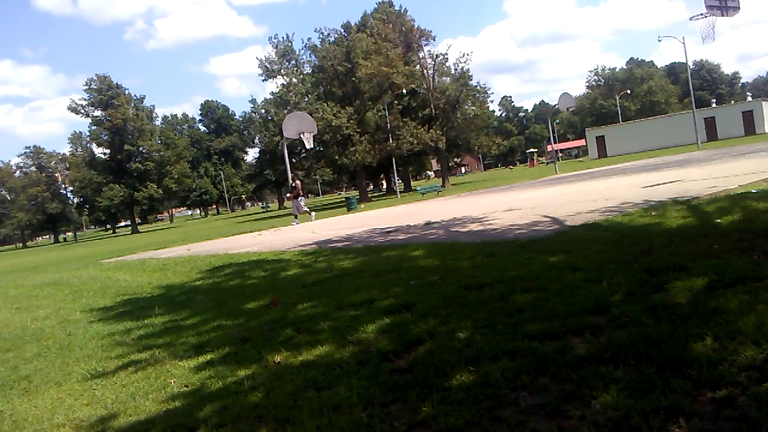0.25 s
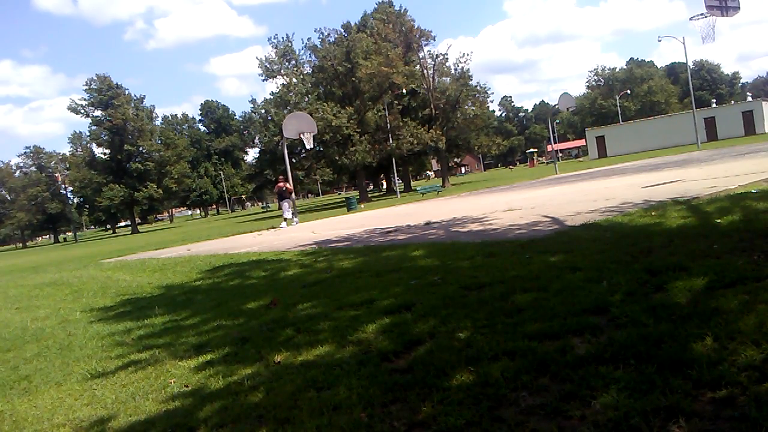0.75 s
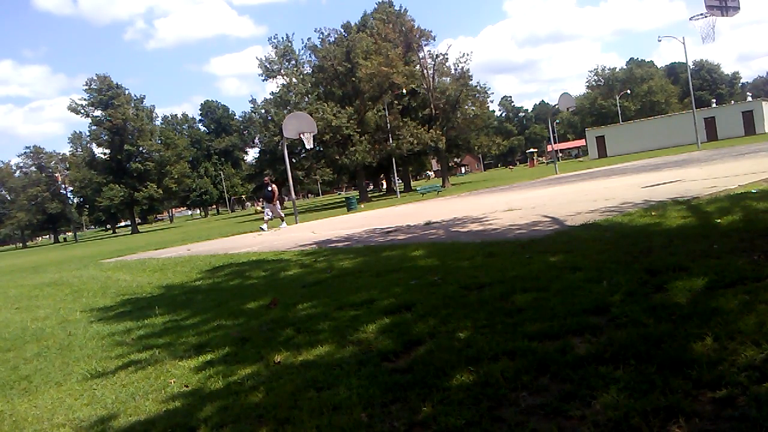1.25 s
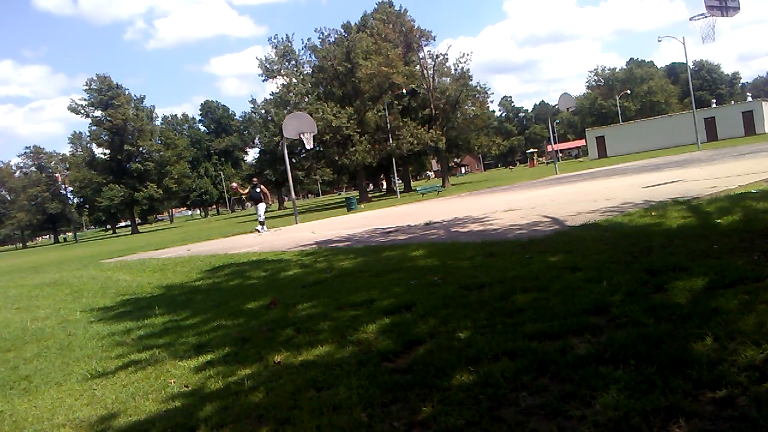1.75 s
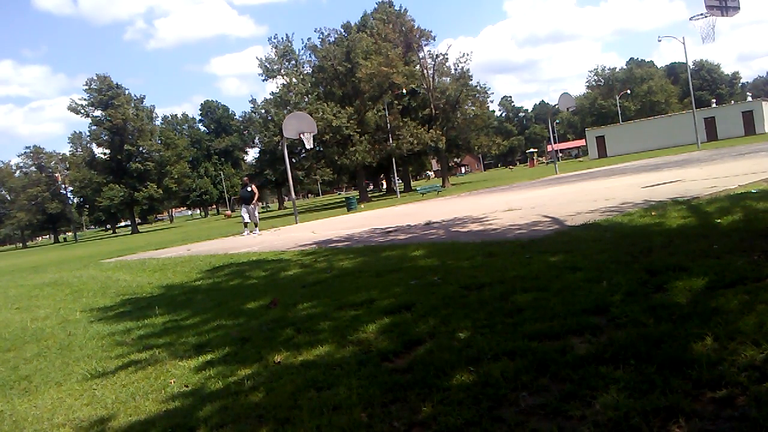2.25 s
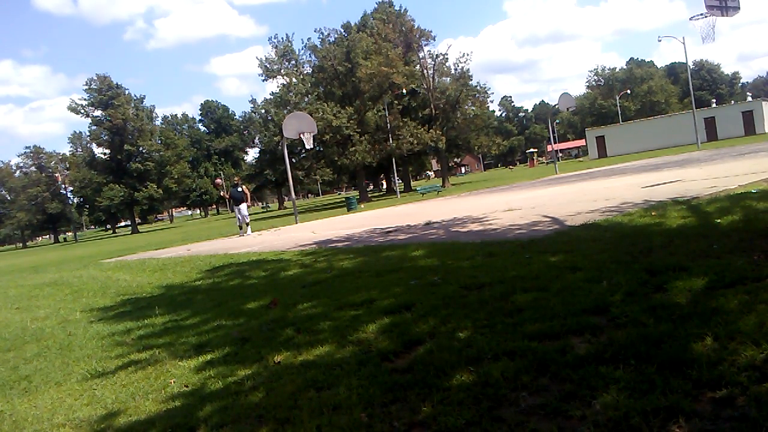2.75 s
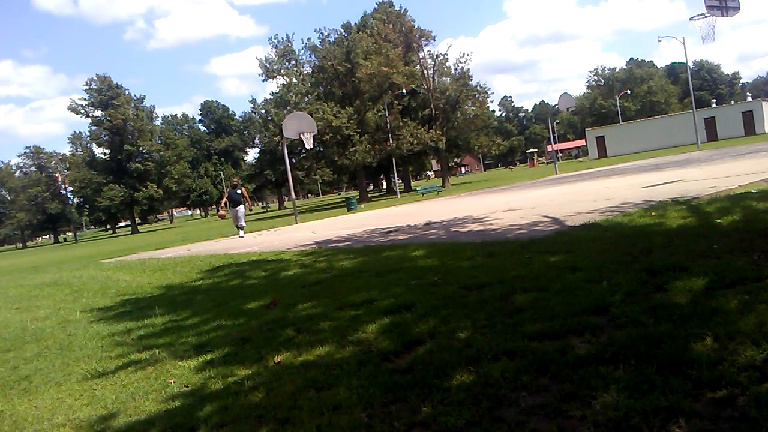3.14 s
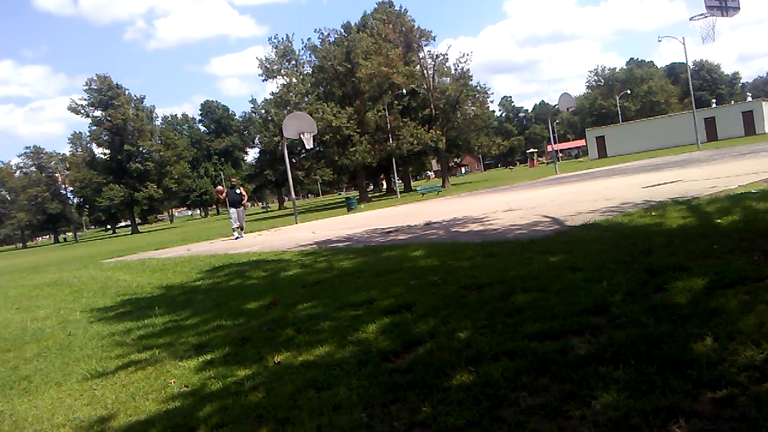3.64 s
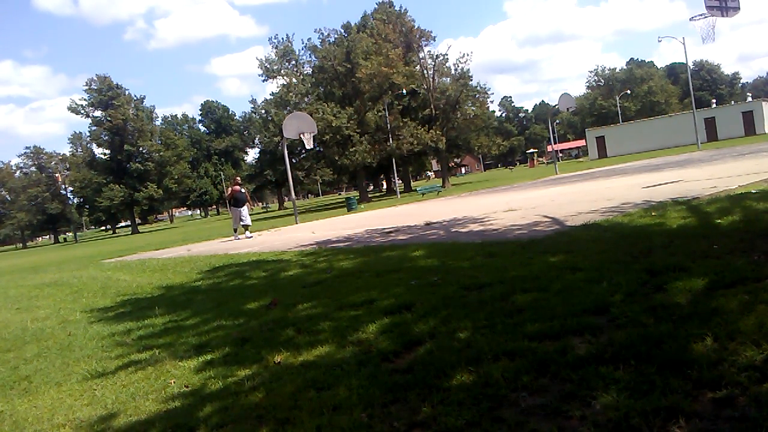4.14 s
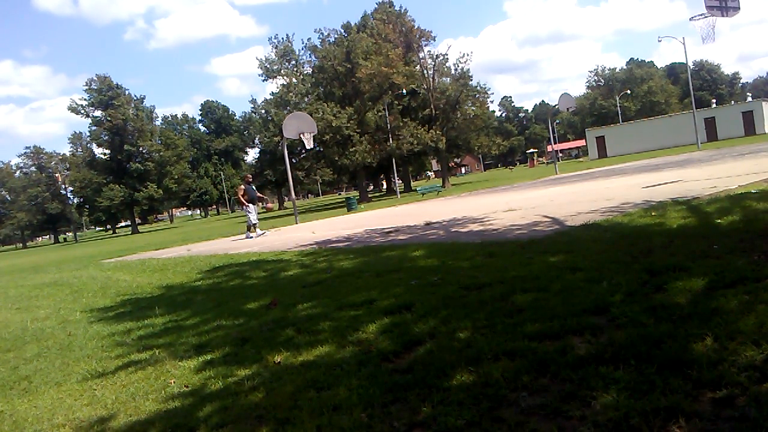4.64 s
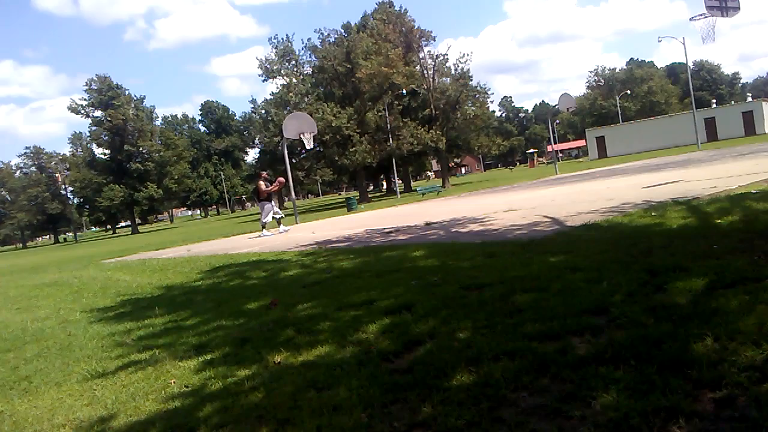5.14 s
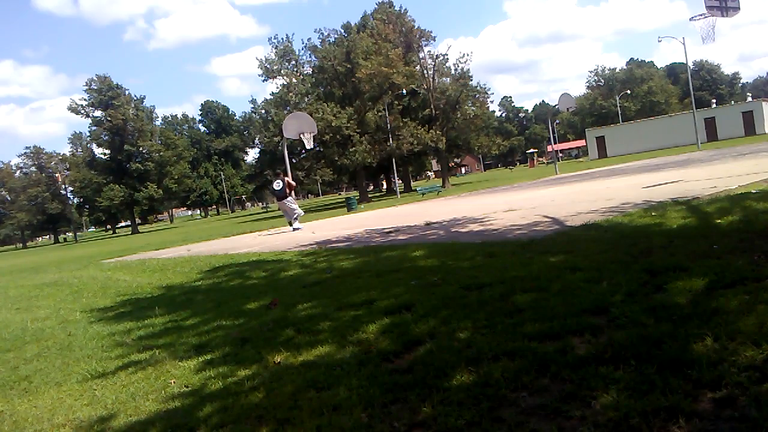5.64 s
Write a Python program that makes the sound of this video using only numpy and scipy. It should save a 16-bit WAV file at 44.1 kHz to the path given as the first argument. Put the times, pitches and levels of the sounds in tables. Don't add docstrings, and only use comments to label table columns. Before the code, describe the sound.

Faint traffic, leaves and machine hum lie under a throbbing cicada and thin high cricket chirps. Four distant basketball bounces crack and ring briefly, the first dull, the third brightest, the last thin and bright, with echoes trailing. Low wind thuds build from the middle, buffeting the handheld microphone and briefly distorting it late. A faint bird whistle rises at the very end.

```python
import sys
import numpy as np
from scipy import signal
from scipy.fft import rfft, irfft
from scipy.io import wavfile
from scipy.ndimage import uniform_filter1d

SR = 44100
rng = np.random.default_rng(int(sys.argv[2]) if len(sys.argv) > 2 else 0)


def decibels_to_gain(level_db):
    exponent = np.asarray(level_db, float) / 20
    return 10 ** exponent


def waveform_to_disk(signal):
    frames = np.transpose(np.atleast_2d(signal))
    scaled = np.clip(frames, -1, 1) * 32767
    samples = np.round(scaled).astype(np.int16)
    wavfile.write(sys.argv[1], SR, samples)


N = 259737
T = np.arange(N) / SR

# t/s, level/dB
CHORUS_EFFORT = [(0, -5), (.3, -3.5), (.75, 1), (4.8, 1.5), (5.5, -5), (5.89, -18)]


def unit(x):
    return x / np.sqrt(np.mean(x ** 2))


def band(x, lo_hz, hi_hz, order=2):
    return signal.sosfilt(signal.butter(order, [lo_hz, hi_hz], "band", fs=SR, output="sos"), x)


def hiss(lo_hz, hi_hz, order=2):
    return unit(band(rng.standard_normal(N), lo_hz, hi_hz, order))


def colour(x, points):
    hz, db = np.transpose(points)
    log_f = np.log(np.arange(len(x) // 2 + 1) * SR / len(x) + 1)
    gain_db = np.interp(log_f, np.log(hz), db, left=-60, right=-60)
    return irfft(rfft(x) * decibels_to_gain(gain_db), len(x))


def walk(rate_hz):
    hold = int(SR / rate_hz)
    held = np.repeat(rng.standard_normal(N // hold + 1), hold)
    return 1.3 * uniform_filter1d(uniform_filter1d(held, hold), hold)[:N]


def curves(table):
    s, *columns = np.transpose(table)
    return [np.interp(T, s, c) for c in columns]


def fade(t, t60):
    return (t >= 0) * np.exp(-np.log(1000) * np.maximum(t, 0) / t60)


def tone(hz):
    return np.sin(2 * np.pi * np.cumsum(hz) / SR)


def add(out, s, x):
    i = int(s * SR)
    out[i:i + len(x)] += x[:N - i]


def steady(x, hold_s):
    return unit(x / uniform_filter1d(x ** 2, int(hold_s * SR)) ** .35)


def swells(base_db, middles_s, lengths_s, peaks_db):
    power = decibels_to_gain(base_db) ** 2
    for s, length_s, db in zip(middles_s, lengths_s, peaks_db):
        hump = np.cos(np.pi * np.clip((T - s) / length_s, -.5, .5)) ** 4
        power = power + decibels_to_gain(db) ** 2 * hump
    return 10 * np.log10(power)


def park():
    # f/Hz, density/dB per Hz
    bed_colour = [(60, -5.5), (100, 6), (200, -42), (330, -40), (600, -15.5), (950, -24.5), (2000, -23.5),
                  (3500, -22), (6500, -37), (9000, -35.5), (11000, -47.5), (15800, -36.5)]
    # f/Hz, width/Hz, level/dB, start/s, end/s
    machines = [(100, 26, -48, 0, 5.9), (192, 14, -53, 0, 5.9), (285, 12, -63, .6, 1.6),
                (520, 4, -63, .9, 2.4), (766, 5, -69, .3, 5.9), (875, 4, -68, .7, 1.3),
                (382, 12, -66, 2.9, 3.5)]
    bed_db, trees_db = -54.5, -61
    bed = decibels_to_gain(bed_db + 1.0 * walk(6.9)) * unit(colour(rng.standard_normal(N), bed_colour))
    bed += decibels_to_gain(curves(CHORUS_EFFORT)[0] + trees_db - 2 + walk(6)) * hiss(5000, 9800)
    for hz, width_hz, db, start_s, end_s in machines:
        gate = np.clip(np.minimum(T - start_s, end_s - T) / 0.046, 0, 1)
        hum = steady(hiss(hz - width_hz / 2, hz + width_hz / 2, order=1), 0.36)
        bed += decibels_to_gain(db + 1.25 * walk(3.85)) * gate * hum
    return bed


def bird():
    t = T - 5.69
    whistle = np.sin(2 * np.pi * (2200 * t + 900 * t ** 2))
    return decibels_to_gain(-61 + 2 * walk(60)) * fade(t, .3) * np.clip(t / .01, 0, 1) * whistle


def cricket():
    # t/s, peak level/dB
    chirp_events = [(0.1087, -62), (0.3615, -60), (0.625, -59), (1.005, -60), (1.2501, -61), (2.0762, -59),
                    (2.318, -63), (3.791, -60), (4.054, -60), (4.336, -58.5), (4.635, -61), (4.9135, -58),
                    (5.1981, -63), (5.4644, -63), (5.7518, -74)]
    out, t = np.zeros(N), T[:SR // 20]
    stroke_hz = 113
    for s, db in chirp_events:
        strokes = np.maximum(np.sin(2 * np.pi * stroke_hz * (t - .004)), 0) ** 0.63
        strokes *= np.sin(np.pi * t / t[-1]) ** 0.55
        hz = 9950 - 6000 * t + 60 * rng.standard_normal()
        add(out, s - .008, decibels_to_gain(db + 2.0) * strokes * tone(hz))
    return out


def cicada():
    # t/s, rate/Hz
    pump_rate = [(0, 10.81), (1.9, 10.81), (3.3, 12.1), (4.75, 14.9), (5.6, 10.2), (5.89, 10)]
    # f/Hz, width/Hz, throb depth/dB, lag/pumps
    resonances = [(4050, 800, 6, .5), (5350, 1100, 8, 0), (6070, 340, 7, 0), (6750, 600, 2.5, 0)]
    drone_db = (-70.5, -69, -69, -68)
    # resonance index, middle t/s, length/s, peak level/dB
    song_swells = [(0, 0.82, 0.3, -67), (0, 2.12, 2.7, -62), (0, 3.04, 1, -61.5), (0, 3.54, 1.06, -60),
                   (0, 4.7, 1.4, -65.5), (1, .75, 0.39, -62.5), (1, 1.5, .5, -69), (1, 2.17, 1.47, -58),
                   (1, 3.5, .6, -79), (2, 2.13, 0.37, -57.5), (2, 2.98, 0.64, -59.5), (2, 3.51, 0.75, -58),
                   (2, 3.92, .6, -58), (2, 4.47, 1.8, -64.5), (2, 1.1, 0.64, -83), (1, 4.9, 1.2, -70),
                   (3, 0.69, 0.73, -62.5), (3, 2.07, 1.2, -57), (3, 2.73, 1.6, -60), (3, 3.73, 1.4, -60.5)]
    start_turns = .7
    pump = start_turns + np.cumsum(curves(pump_rate)[0]) / SR
    repeat = np.r_[1, np.zeros(115), -.3]
    beat = 1 + .22 * np.cos(2 * np.pi * np.cumsum(390 + 8 * walk(3)) / SR)
    out = 0
    which, *phrases = np.transpose(song_swells)
    for k, (hz, width_hz, depth_db, lag) in enumerate(resonances):
        own = np.round(which) == k
        db = swells(drone_db[k] + curves(CHORUS_EFFORT)[0], *(column[own] for column in phrases))
        ribs = beat * signal.lfilter([1], repeat, rng.standard_normal(N))
        throb = ((1 + np.cos(2 * np.pi * (pump - lag))) / 2) ** 1.7
        song_db = db + depth_db * throb * (1 + 0.07 * walk(3.16)) + walk(7)
        out = out + decibels_to_gain(song_db) * unit(band(ribs, hz - width_hz / 2, hz + width_hz / 2))
    return out


def wind():
    # t/s, level/dB
    breeze = [(0, -59), (.5, -45.5), (1.5, -46), (2.6, -46), (3.25, -46.5), (3.65, -30.5), (4.45, -28),
              (4.55, -35), (5.1, -30), (5.89, -37)]
    # middle t/s, length/s, rumble level/dB, sharpness (flutter re rumble)/dB
    gust_events = [(1.67, 0.12, -35, -23), (1.997, 0.12, -32.5, -19), (2.11, 0.045, -24, -36),
                   (2.193, 0.045, -23.5, -22), (2.466, 0.15, -37, -11), (2.712, 0.27, -39.5, -28),
                   (3.147, 0.18, -36.5, -22), (3.384, 0.11, -29, -10), (3.661, 0.14, -27.5, -3),
                   (3.813, 0.089, -21, -39), (3.95, 0.17, -24.5, -14), (4.065, 0.24, -28.5, -14),
                   (4.13, 0.14, -23.5, 0), (4.253, 0.087, -24, -9.5), (4.431, 0.12, -21.5, -3),
                   (4.592, 0.078, -30.5, -27), (4.697, 0.063, -18, -18.5), (4.742, 0.091, -24.5, -3.5),
                   (4.801, .1, -27.5, -8.5), (4.886, 0.032, -27, -4.5), (1.788, 0.098, -38.5, -4),
                   (4.967, 0.086, -17, -6.5), (5.06, 0.065, -26.5, -12.5), (5.14, 0.047, -37, -12),
                   (5.26, 0.12, -30.5, -4.5), (5.424, 0.14, -31, -12), (5.546, 0.098, -23.5, -17.5),
                   (5.616, 0.054, -26.5, -6), (5.706, 0.079, -23.5, -5.5), (5.801, 0.15, -30.5, -9)]
    # t/s, peak level/dB, swing f/Hz
    eddy_events = [
        (3.6655, -17, 95),
        (3.814, -14, 95),
        (4.128, -19, 150),
        (4.405, -19, 120),
        (5.267, -6.5, 80),
        (5.281, -7.5, 64),
    ]
    # calm level/dB, slope/dB per dB of breeze
    flutter_base = (-55, 0.5351)
    rasp_base = (-61.5, 0.5061)
    # offset/dB, slope/dB per dB of flutter, slope/dB per dB of sharpness
    rasp_gust = (-3.44, 1.455, 0.97)
    calm_db, brisk_db = -44, 10

    breeze_db = curves(breeze)[0]
    rise_db = breeze_db - calm_db
    s, length_s, db, sharp_db = np.transpose(gust_events)
    rumble_db = swells(breeze_db, s, 2 * length_s, db)
    flutter_db = swells(flutter_base[0] + flutter_base[1] * rise_db, s, 1.06 * length_s, db + sharp_db)
    rasp_peak_db = rasp_gust[0] + rasp_gust[1] * (db + sharp_db) + rasp_gust[2] * sharp_db
    rasp_db = swells(rasp_base[0] + rasp_base[1] * rise_db, s, 0.96 * length_s, rasp_peak_db)

    flicker = walk(30)
    brisk = np.clip(rise_db / brisk_db, 0, 1)
    noise = rng.standard_normal(N)
    rumble = np.sqrt(1 - .75 * brisk) * unit(band(noise, 42, 78, order=3))
    rumble += brisk * unit(band(noise, 52, 108, order=3))
    out = decibels_to_gain(rumble_db + 1.2 * flicker) * steady(rumble, .05)
    out += decibels_to_gain(flutter_db + 2.2 * flicker) * steady(hiss(105, 205, order=3), .04)
    out += decibels_to_gain(rasp_db + 2.5 * flicker) * steady(hiss(215, 420), .03)

    t = T[:SR // 20]
    for s, db, hz in eddy_events:
        turn = hz * t * (1 + .35 * np.exp(-t / .004))
        gate = np.clip(t / .002, 0, 1) * np.clip((1.15 - turn) / .8, 0, 1)
        add(out, s, decibels_to_gain(db + 1.5) * np.sin(2 * np.pi * turn) * gate)
    return out


def slap_of(t, treble_db):
    top_hz = 4320 + 41 * treble_db
    start_hz = 1650 + 25 * (treble_db + 14)
    rise_hz = top_hz - (top_hz - start_hz) * np.exp(-t / .0012)
    fall_hz = top_hz + 2000 * np.exp(-t / 0.00106)
    slap = tone(rise_hz) * fade(t, 0.0085) * np.clip((.0045 - t) / 0.0005, 0, 1)
    slap += decibels_to_gain(0.75 * treble_db + 2.5) * tone(fall_hz) * fade(t, 0.027)
    grit = hiss(6500, 9300, order=3)[:len(t)]
    slap += decibels_to_gain(treble_db - 1) * grit * fade(t, .012)
    build_s = .00012 * decibels_to_gain(-.5 * (treble_db + 14))
    return slap * (1 - np.exp(-t / build_s))


def thump_of(t):
    # f/Hz, level/dB, t60/s
    shell_modes = [
        (108, -1, .06),
        (262, 0, .048),
    ]
    (low_hz, low_db, low_t60), (hz, db, t60) = shell_modes
    patch = np.cos(2 * np.pi * hz * (t - .0008)) * fade(t, t60) * (1 - np.exp(-t / 0.0011))
    late = t - .001
    return decibels_to_gain(db) * patch - decibels_to_gain(low_db) * np.sin(2 * np.pi * low_hz * late) * fade(late, low_t60)


def ball():
    # t/s, slap peak/dB, thump/dB re slap, treble/dB re slap, main air ring f/Hz
    bounce_events = [
        (1.3791, -19.5, -2.5, -32, 1400),
        (2.376, -17, -3, -21, 1190),
        (3.502, -18, -1.5, -12.5, 1420),
        (4.7418, -18, -10, -14, 1373),
    ]
    # f/Hz, level/dB, t60/s
    cavity_modes = [(426, -17.5, 0.093), (538, -21.5, 0.073), (603, -50, 0.046), (775, -25.5, 0.075),
                    (1897, -8, 0.0093), (2490, -57, 0.055)]
    # multiple of main ring, level/dB, t60/s, level in echoes/dB
    sphere_modes = [(1.002, -12.5, 0.028, -13.5), (1.62, -12.5, 0.012, -24), (2.2, -22, 0.013, -20)]
    # f/Hz, density/dB per Hz
    echo_colour = [(500, 13), (900, 0), (1300, 10.5), (2100, 7), (2800, 10.5), (3400, 4), (5000, -1.5),
                   (9000, -10.5), (14000, -53)]
    # delay/s, level/dB, t60/s
    echo_paths = [
        (0.0055, 12, 0.072),
        (0.066, -7, 0.24),
        (0.022, -5.5, .65),
    ]
    echo_db = -43.5
    wall_s, wall_db = .068, -21

    out, t = np.zeros(N), T[:SR // 2]
    for s, slap_db, thump_db, treble_db, ring_hz in bounce_events:
        slap = slap_of(t, treble_db)
        ring = np.zeros(len(t))
        for hz, db, t60 in cavity_modes:
            ring += decibels_to_gain(db + thump_db + 3) * np.sin(2 * np.pi * (hz * t + rng.random())) * fade(t, t60)
        for multiple, db, t60, _ in sphere_modes:
            ring += decibels_to_gain(db) * np.sin(2 * np.pi * multiple * ring_hz * t) * fade(t, t60)
        ring *= 1 - np.exp(-t / 0.00034)

        spread = np.zeros(len(t))
        for lag_s, db, t60 in echo_paths:
            late = t - lag_s
            spread += decibels_to_gain(db) * fade(late, t60) * (1 - np.exp(-np.maximum(late, 0) / 0.0015))
        tilt = [(hz, db + (treble_db + 25.5) * min(hz / 8000, 1)) for hz, db in echo_colour]
        noise = rng.standard_normal(len(t))
        scatter = unit(colour(noise, tilt))
        for multiple, _, _, db in sphere_modes:
            scatter += decibels_to_gain(db) * unit(band(noise, multiple * ring_hz - 150, multiple * ring_hz + 150))

        direct = slap + decibels_to_gain(thump_db + 4.0) * thump_of(t) + ring
        add(out, s, decibels_to_gain(slap_db) * direct + decibels_to_gain(echo_db) * spread * scatter)
        add(out, s + wall_s, decibels_to_gain(slap_db + wall_db) * band(slap + ring, 900, 3200))
    return band(out, 20, 10000)


def scene():
    return (park() + bird() + cricket() + cicada() + wind() + ball())[None]


def low_pass(x):
    return signal.sosfilt(signal.butter(12, 15760, fs=SR, output="sos"), x)


def record(dry):
    x = signal.sosfilt(signal.butter(2, 33, "high", fs=SR, output="sos"), dry)
    over = np.clip((np.maximum(x, -.9 * x) - .28) / .06, 0, 1)
    rattle = decibels_to_gain(-55) * hiss(5500, 6500) + decibels_to_gain(-61) * hiss(11000, 13000)
    rattle += decibels_to_gain(-60) * hiss(1000, 15500, order=1)
    x = .6 * np.tanh(x / .6) + over * rattle
    x = signal.sosfilt(signal.ellip(8, .2, 60, 15740, fs=SR, output="sos"), x)
    return low_pass(x)


dry = scene()
out = record(dry)
waveform_to_disk(out)
```